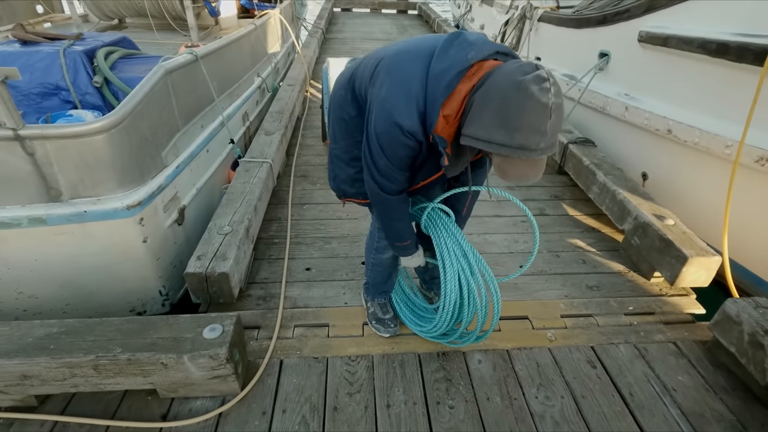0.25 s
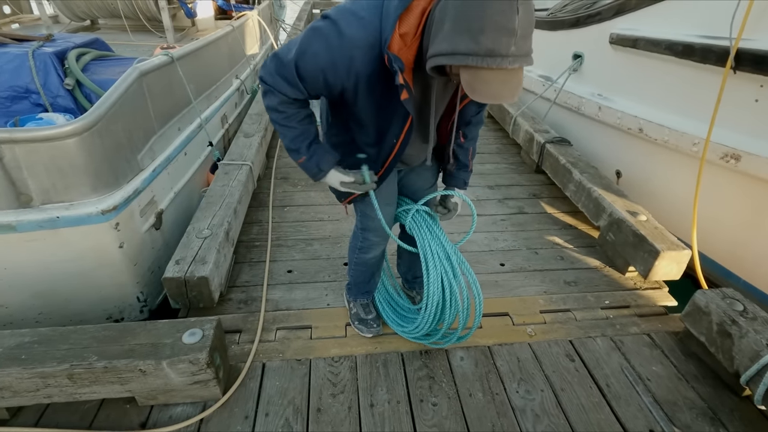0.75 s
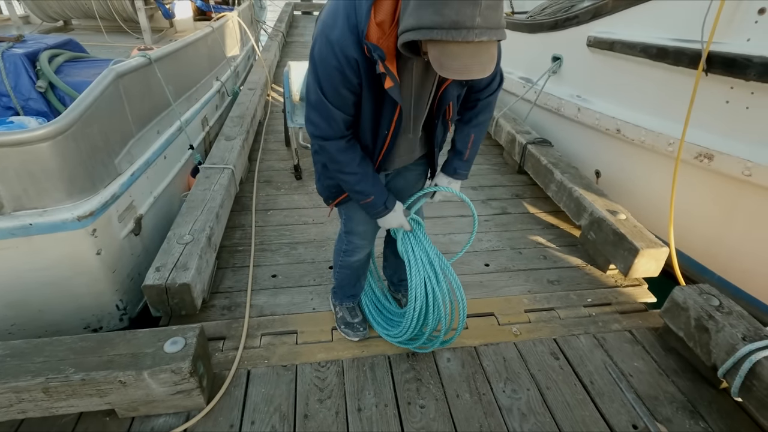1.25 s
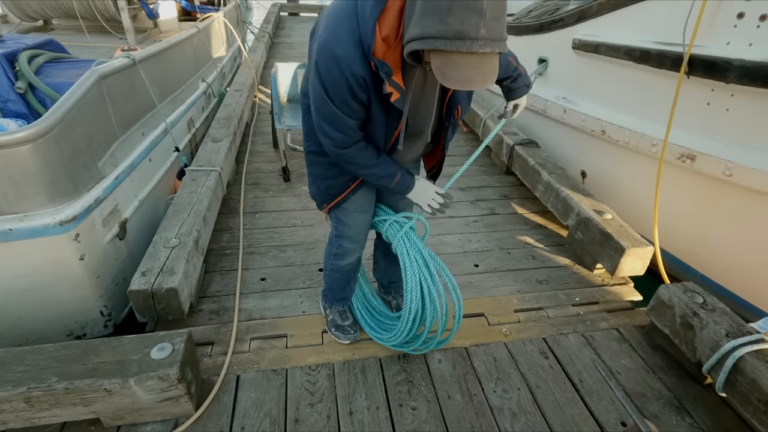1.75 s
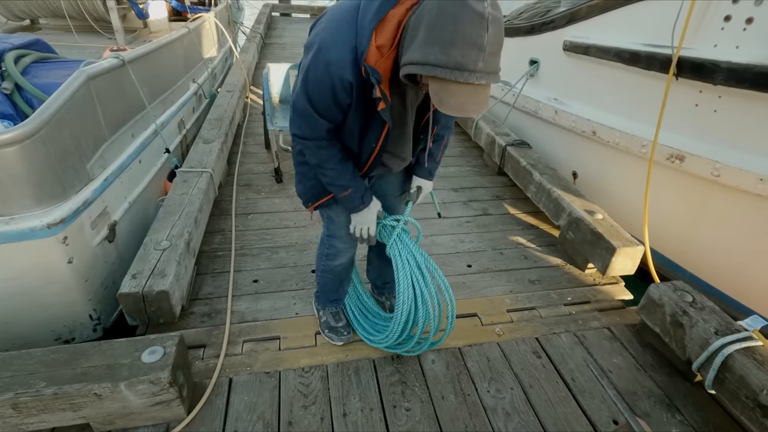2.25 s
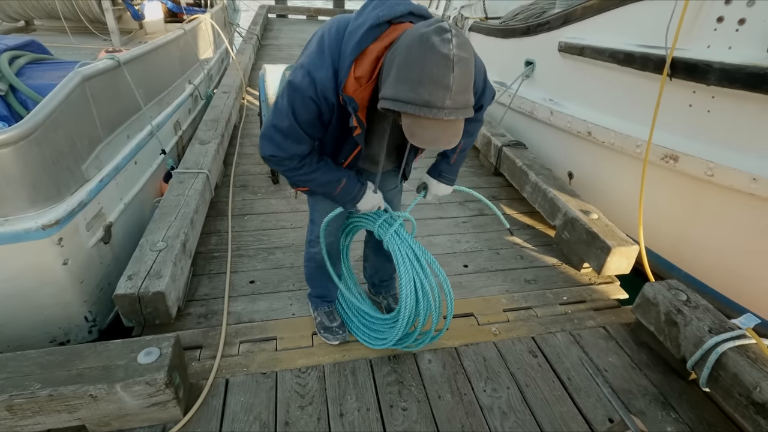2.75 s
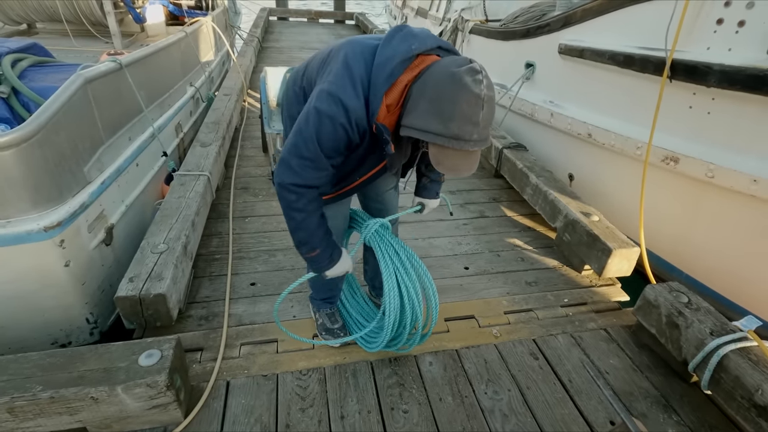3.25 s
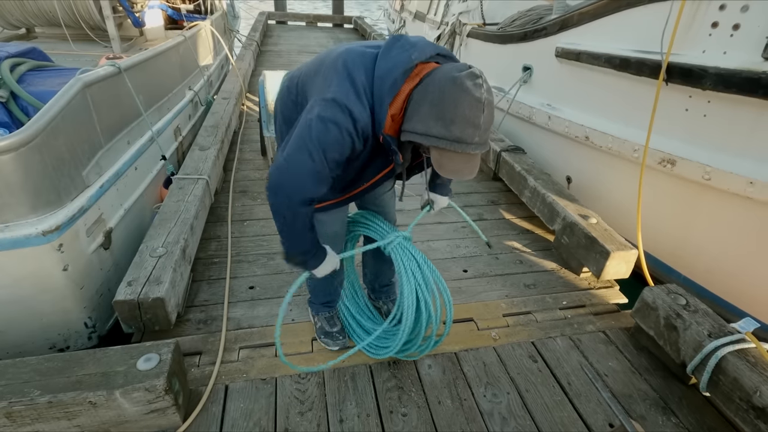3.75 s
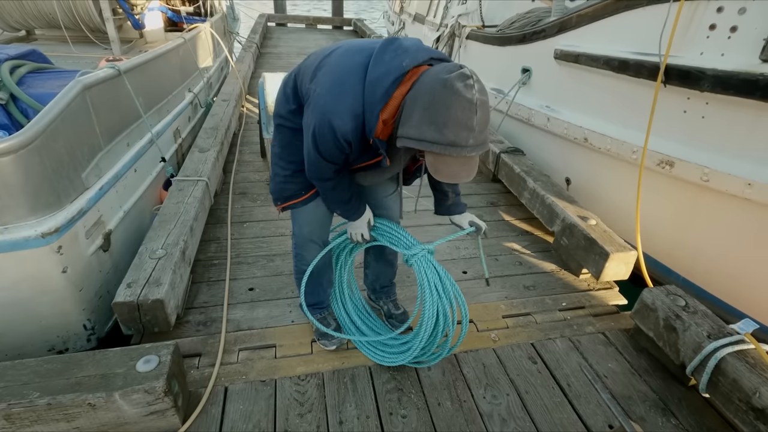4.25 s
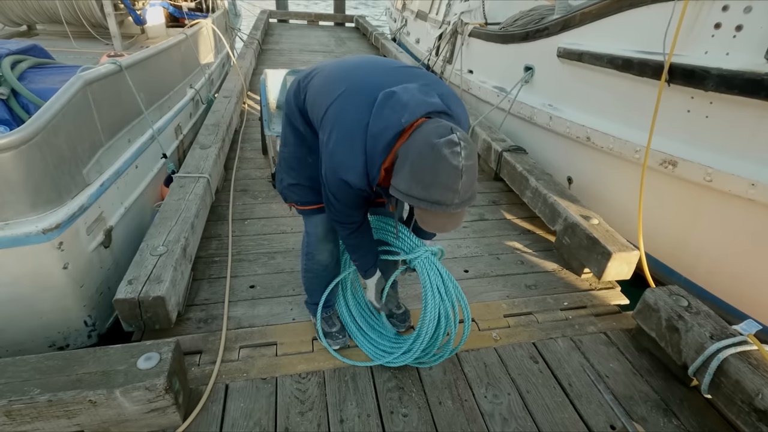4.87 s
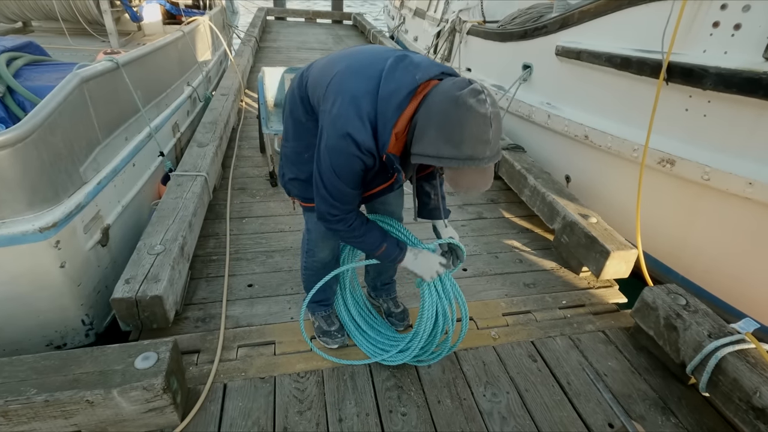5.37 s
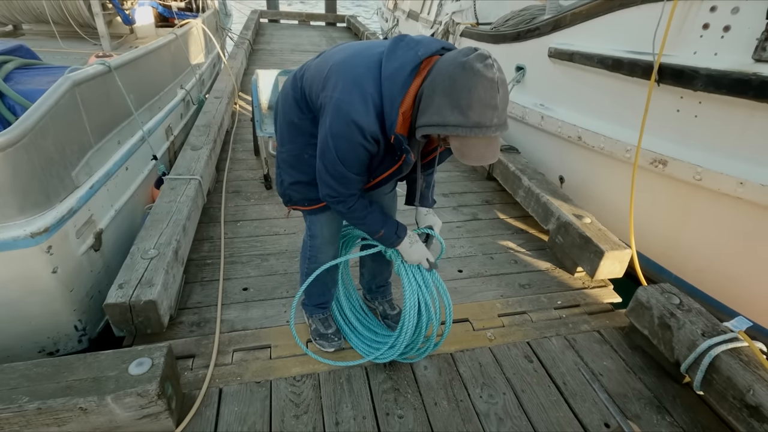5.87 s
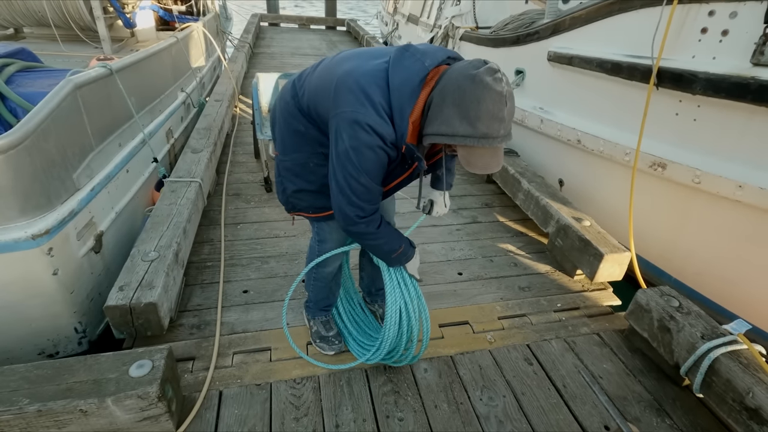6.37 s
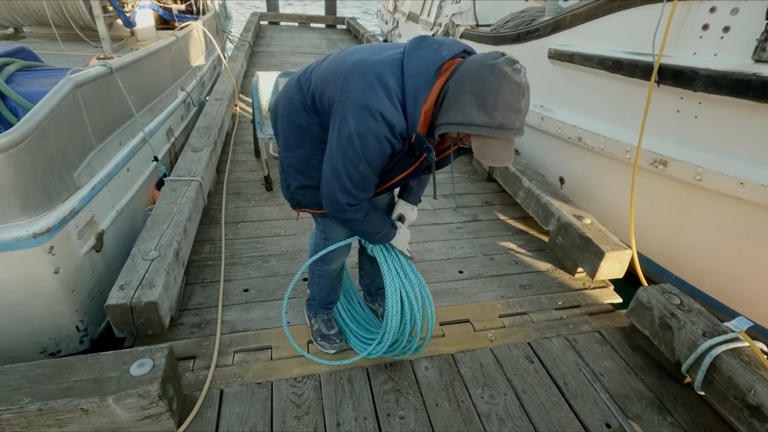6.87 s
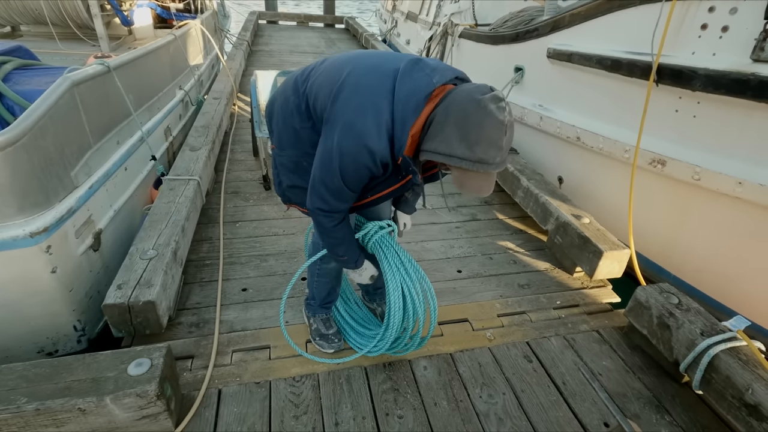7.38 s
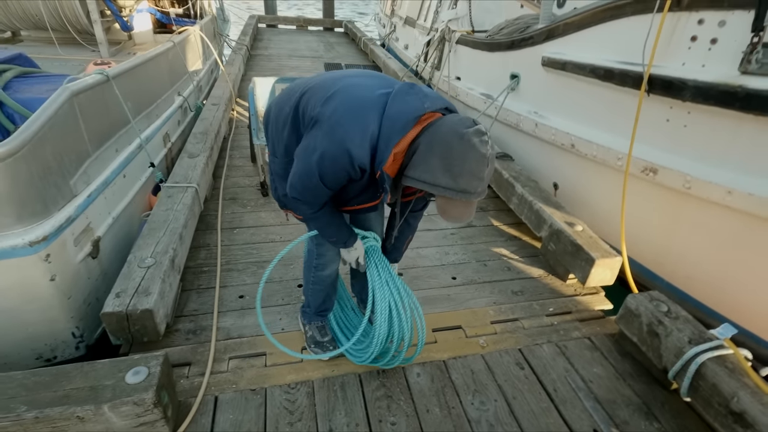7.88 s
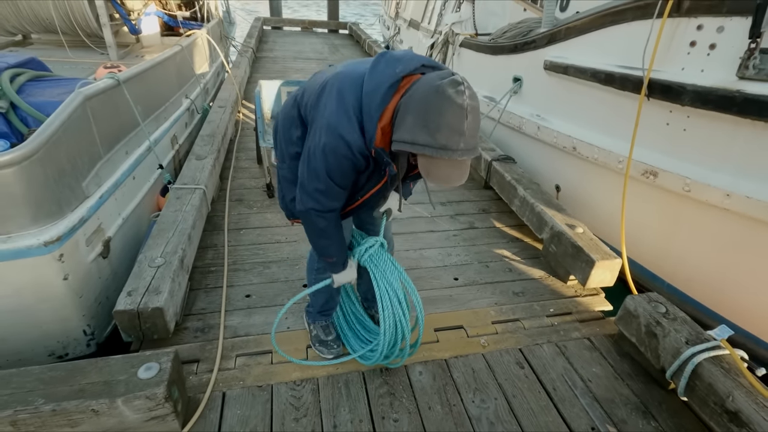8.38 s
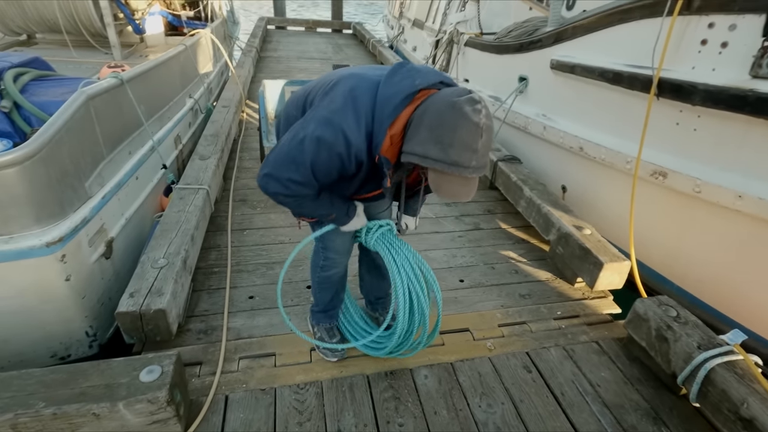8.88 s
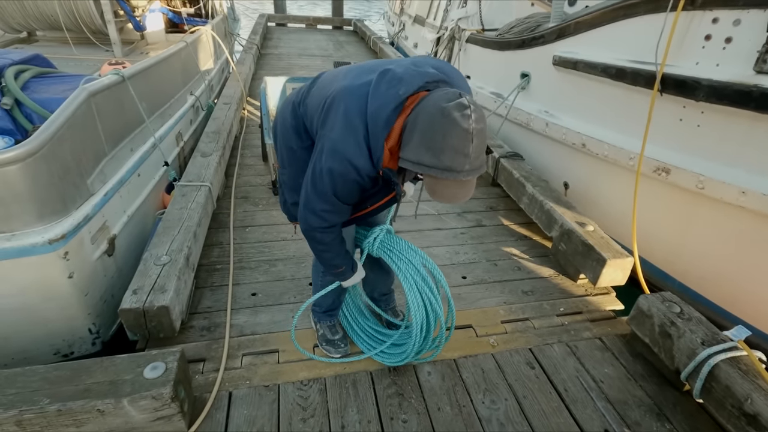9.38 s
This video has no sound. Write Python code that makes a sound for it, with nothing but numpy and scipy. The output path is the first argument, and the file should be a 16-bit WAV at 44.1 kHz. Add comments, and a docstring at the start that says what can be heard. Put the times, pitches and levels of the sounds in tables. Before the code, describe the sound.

Someone ties up a coil of stiff rope on a dock, heard under gusts of deep wind rumble on the microphone. The rope first slides through a glove in a building rasp, then gives a quick tug with a cluster of sharp knocks. Softer pulls, scattered taps, ticks and jacket rustle follow, the knocks growing busier near the end. Faint drips and a far harbour hum lie behind.

```python
"""First you hear wind buffeting the microphone, with a lumpy rumble and slow pressure swings.
On a wooden dock, stiff plastic rope is pulled through gloved hands and tied round its coil:
its strands catch on the glove and rasp, loops knock on the coil among small high ticks,
and jacket and rope rustle and swish. Behind it, drops trap ringing bubbles between the hulls,
over the far hum of the harbour."""
import sys
import numpy as np
from scipy import signal
from scipy.fft import rfft, irfft
from scipy.io import wavfile
from scipy.ndimage import uniform_filter1d

SR = 44100
rng = np.random.default_rng(int(sys.argv[2]) if len(sys.argv) > 2 else 0)


def put_to_file(sound):
    """Save the sound as 16-bit audio at rate SR, in the file named by the first command-line argument."""
    columns = np.atleast_2d(sound).T  # one column per channel
    safe = np.clip(columns, -1, 1)
    whole_steps = np.round(safe * 32767)
    wavfile.write(sys.argv[1], SR, whole_steps.astype(np.int16))


N = 424683


def gain_of(db):
    """Turns decibels into a number to multiply by."""
    return 10 ** (np.asarray(db) / 20)


def evened(x):
    """Scales a signal so that its average strength (rms) is 1."""
    return x / np.sqrt(np.mean(x ** 2) + 1e-20)


def curve(rows):
    """Joins (t/s, level/dB) points with straight lines, giving a level for every sample."""
    s, db = np.transpose(rows)
    return np.interp(np.arange(N) / SR, s, db)


def coloured(x, points):
    """Shapes the tone of x by (f/Hz, level/dB) points and cuts all beyond them; rms 1."""
    hz, db = np.transpose(points)
    f = np.maximum(np.fft.rfftfreq(len(x), 1 / SR), 1e-3)
    shape_db = np.interp(np.log(f), np.log(hz), db, left=-200, right=-200)
    return evened(irfft(rfft(x) * gain_of(shape_db), len(x)))


def wander(seconds):
    """A smooth random drift of rms 1 that changes over the given time."""
    size = max(round(seconds * SR), 2)
    return evened(uniform_filter1d(uniform_filter1d(rng.standard_normal(N), size), size))


def steady(x, seconds):
    """Removes most of a noise's own drift in level, so that a curve can set it."""
    size = round(seconds * SR)
    power = uniform_filter1d(uniform_filter1d(x ** 2, size), size)
    return evened(x / np.sqrt(abs(power) + 0.15))


def resonate(x, hz, width):
    """Lets x ring around one pitch; a smaller width (Hz) rings longer."""
    r = np.exp(-np.pi * width / SR)
    return 2 * signal.lfilter([1 - r], [1, -r * np.exp(2j * np.pi * hz / SR)], x).real


def band(x, hz, width):
    """Keeps one band of x by ringing it twice; rms 1."""
    return evened(resonate(resonate(x, hz, width), hz, width))


def add(mix, s, sound):
    """Mixes a sound in at s seconds."""
    part = mix[round(s * SR):][:len(sound)]
    part += sound[:len(part)]


def swell(s, db, rise_s, fall_s, rise_round=2.52):
    """The gain of one movement: up 60.5 dB over rise_s to its peak at s, down as much over fall_s."""
    t = np.arange(N) / SR - s
    from_peak = np.minimum(abs(t) / np.where(t < 0, rise_s, fall_s), 8)
    return gain_of(db - 60.5 * from_peak ** np.where(t < 0, rise_round, 2.52))


def slips(per_s, spread_db, clump_db, clump_s):
    """Rubbing surfaces stick and slip, making clumps of uneven clicks."""
    size = gain_of(spread_db * np.minimum(rng.exponential(1, N), 4))
    clicks = size * rng.standard_normal(N) * (rng.random(N) < per_s / SR)
    return clicks * gain_of(clump_db * wander(clump_s))


# tone of the far harbour hum and water wash: f/Hz, level/dB
WASH_TONE = [(60, -2.5), (100, -3), (222, -8.5), (363, -12), (1030, -16), (3180, -30.5), (6000, -34),
             (8500, -33), (10000, -36.5), (16000, -38)]
# a far engine's drone comes and goes: t/s, level/dB
ENGINE_LEVELS = [(.3, -68), (1, -58), (2.3, -58), (3.3, -66)]


def harbour(wash_db=-48.5, engine_hz=226.4):
    """A smooth far wash swells a little, and an engine drones on one wavering note."""
    wash = gain_of(wash_db + .7 * wander(.1)) * coloured(rng.standard_normal(N), WASH_TONE)
    pitch = engine_hz + .8 * wander(.3)
    drone = np.sqrt(2) * np.sin(2 * np.pi * np.cumsum(pitch) / SR)
    return wash + gain_of(curve(ENGINE_LEVELS)) * drone


# nearby water drips: t/s, level/dB, bubble f/Hz, time until it bursts/s
NEAR_DRIPS = [(0.645, -39.5, 1055, 0.03), (.878, -40, 810, 0.0053), (2.328, -36.5, 437, 0.016),
              (2.863, -40, 1656, 0.0019), (3.642, -42.5, 2040, 0.0061), (3.672, -37.5, 810, 0.02),
              (5.808, -36.5, 984, 0.021), (6.5, -38.5, 1510, 0.0092), (7.621, -41, 1180, 0.02)]


def drips(far_count=120):
    """Each drop, near or far, traps a bubble that rings, rises slightly in pitch and bursts."""
    out, t = np.zeros(N), np.arange(4000) / SR
    far_drips = rng.random((far_count, 4)) * [N / SR, 9, 1300, .015] + [0, -61.5, 400, .005]
    for s, db, hz, burst_s in [*NEAR_DRIPS, *far_drips]:
        rise = np.minimum(t / 0.00068, 1)
        fade = gain_of(-180 * t - 930 * np.maximum(t - burst_s, 0))
        bubble = np.sin(2 * np.pi * hz * (t + 0.52 * t ** 2))
        add(out, s, gain_of(db) * rise * fade * bubble)
    return out


# strength of the gusts: t/s, rumble level/dB, buffeting level/dB
GUST_LEVELS = [(.05, -20, -31), (.33, -31, -40), (.51, -23, -35), (.87, -31, -48), (1.0, -31, -33),
               (1.15, -33, -46), (1.85, -30, -42), (2.82, -40, -54), (2.94, -17, -29), (3.08, -19, -37),
               (3.62, -43, -50), (3.92, -35, -46), (4.1, -43, -50), (4.3, -25, -45), (5.1, -38, -47),
               (5.4, -18, -41), (5.8, -25, -41), (6.1, -31, -38), (6.42, -23, -35), (6.6, -30, -44),
               (7.1, -28, -37), (7.27, -34, -45), (7.48, -14, -33), (7.65, -23, -38), (8.25, -21, -36),
               (8.76, -18, -25), (8.95, -28, -36), (9.6, -24, -32)]
# strength of the slow pressure swings: t/s, level/dB
SWING_LEVELS = [(0.0, -12), (0.99, -8), (1.29, -14), (8.85, -7), (9.63, -13)]
# tones of the slow swings, the deep rumble and the buffeting: f/Hz, level/dB
SWING_TONE = [(1, -4), (3, 0), (10, -2), (15, -9), (20, -30), (25, -55)]
RUMBLE_TONE = [(12, -30), (19, 0), (30, -8), (40, -13), (50, -40)]
BUFFET_TONE = [(30, -30), (42, 0), (55, -2), (100, -13), (200, -29), (400, -66)]


def wind(travel_limit=.95):
    """Big swirls of air push the microphone's membrane slowly; small ones rumble, buffet and roar."""
    swing = steady(coloured(rng.standard_normal(N), SWING_TONE), seconds=.4)
    swing *= gain_of(curve(SWING_LEVELS))
    swing /= (1 + (swing / travel_limit) ** 4) ** .25  # the membrane can only move so far
    lumps = gain_of(3 * wander(.13))
    rumble = steady(coloured(rng.standard_normal(N), RUMBLE_TONE), seconds=.25) * lumps
    buffet = evened(steady(coloured(rng.standard_normal(N), BUFFET_TONE), seconds=.18) * lumps)
    roar = evened(resonate(resonate(rng.standard_normal(N), 125, 175), 100, 2100) * lumps)
    gusts = np.array(GUST_LEVELS)
    rumble_db, buffet_db = curve(gusts[:, [0, 1]]), curve(gusts[:, [0, 2]])
    roar_db = -48.5 + 0.74 * (buffet_db + 38)  # follows the buffeting, but changes less
    return swing + gain_of(rumble_db) * rumble + gain_of(buffet_db) * buffet + gain_of(roar_db) * roar


# soft swishes of sleeves, and of the rope trailing off after a pull:
# peak t/s, level/dB, build-up/s, die-away/s, centre f/Hz
SOFT_SWISHES = [(.17, -50.5, 0.09, 0.071, 2630), (1.575, -51, .05, 0.063, 1770),
                (6.055, -54, 0.091, 0.065, 4200), (6.31, -54, 0.071, .04, 3000)]


def swishes():
    """A sliding sleeve or trailing rope makes one soft band of smooth noise."""
    noise = rng.standard_normal(N)
    return sum(swell(*move) * band(noise, hz, 0.72 * hz) for *move, hz in SOFT_SWISHES)


# tone of the rustle, with the microphone's treble dip and peak: f/Hz, level/dB
RUSTLE_TONE = [(600, 12), (1400, 6), (2600, 2.5), (4000, -0.5), (6300, -4), (8400, -1.5), (9800, -10.5),
               (13000, -8), (16000, -17)]


def rustling():
    """Thousands of tiny slips each second blur into a fine rustle."""
    return coloured(slips(per_s=12000, spread_db=3, clump_db=1.6, clump_s=.005), RUSTLE_TONE)


# hands and jacket moving: peak t/s, level/dB, build-up/s, die-away/s
JACKET_MOVES = [(.24, -53.5, 0.049, 0.052), (.62, -56, 0.27, 0.28), (1.72, -58, 0.094, 0.28),
                (2.16, -57.5, .1, 0.081), (2.45, -56.5, 0.31, 0.36), (2.75, -59, 0.43, 0.28),
                (3.04, -56, 0.098, 0.2), (3.19, -45.5, 0.036, 0.15), (3.82, -51.5, 0.13, 0.18),
                (4.25, -56, 0.52, 1), (4.79, -51, 0.021, 0.078), (5.0, -53, 0.089, 0.03),
                (5.18, -57.5, 0.17, 0.42), (6.42, -53, 0.22, 0.21), (7.21, -54, 0.059, 0.15),
                (7.8, -50.5, 0.42, 0.51), (8.27, -53, 0.22, 0.48), (8.898, -54.5, 0.18, 0.13),
                (9.24, -55.5, 0.48, 0.29)]


def jacket(rustle, still_db=-60, crinkle_db=-17):
    """Cloth rustles with each move, and faintly in between; its stiff folds tick on top."""
    folds = slips(per_s=60, spread_db=2.5, clump_db=3, clump_s=.03)
    crinkles = gain_of(crinkle_db) * band(folds, hz=13000, width=2500)
    moving = sum(swell(*move) for move in JACKET_MOVES) + gain_of(still_db)
    return moving * (rustle + crinkles)


# loops knocking on the coil, and small high crackling ticks:
# t/s, level/dB, centre f/Hz, rub level compared with the knock or tick/dB
KNOCKS_AND_TICKS = [(.63, -30, 605, -30), (0.799, -43, 6960, 2), (1.383, -33, 1790, -17),
                    (1.657, -39, 3020, 5), (2.24, -36, 960, -25), (2.325, -31, 826, -17),
                    (2.459, -36.5, 2290, 0.5), (3.163, -19, 3180, -21), (3.173, -16, 480, -28),
                    (3.187, -25.5, 700, -9), (3.201, -27, 600, -7), (4.08, -31.5, 850, -34),
                    (4.201, -30, 1200, -4.5), (4.458, -35, 7000, 3.5), (4.674, -33.5, 950, -23),
                    (4.767, -21, 2480, -13.5), (4.781, -24, 1210, -29), (4.789, -28.5, 1370, -14),
                    (4.811, -29, 1110, -34), (4.937, -29, 1540, -27), (5.223, -33, 2010, -20),
                    (6.235, -34.5, 840, -29), (7.017, -34, 790, -12), (7.543, -41, 8000, 2.5),
                    (7.737, -34.5, 9000, -21), (7.794, -35.5, 1360, -1.5), (7.827, -34.5, 1390, -2),
                    (8.015, -34.5, 9000, -5), (8.201, -39, 6940, -15), (8.27, -29, 9250, -13),
                    (8.295, -35, 8000, -12), (8.437, -37.5, 11100, -31), (8.538, -31.5, 1150, -5),
                    (8.743, -37, 9000, -35), (8.869, -20.5, 2300, -31), (8.8727, -17, 890, -22),
                    (8.948, -33.5, 1310, -7), (9.152, -36.5, 1470, -23), (9.177, -28.5, 1200, -12),
                    (9.234, -28, 970, -11), (9.316, -27.5, 1090, -26)]


def knocks_and_ticks(sharp_db=-22, soft_rise_s=.005):
    """Short bursts with a crisp rub on top: low ones are loops landing, the highest are ticks."""
    out, t = np.zeros(N), np.arange(5000) / SR
    burst_fade = gain_of(-60 * t / .016) + gain_of(-17 - 60 * t / .14)  # a faint rattle lingers
    rub_fade = gain_of(-60 * t / .03) + gain_of(-16 - 60 * t / .14)
    for s, db, hz, rub_db in KNOCKS_AND_TICKS:
        burst_noise, rub_noise = rng.standard_normal((2, len(t)))
        sharpness = min(gain_of(db - sharp_db), 1)
        rise_s = soft_rise_s * (1 - sharpness)  # strong ones start at once, weak ones ease in
        rise = np.minimum((t + 1 / SR) / (rise_s + 1 / SR), 1)
        push = burst_noise * burst_fade * rise
        push[0] = 5 * sharpness ** 2  # the opening click
        burst = resonate(resonate(push, hz, 0.8 * hz), hz, 1.6 * hz)
        rub = gain_of(rub_db) * coloured(rub_noise, RUSTLE_TONE) * rub_fade * rise
        add(out, s - rise_s / 2, gain_of(db) * (burst / abs(burst).max() + rub))
    return out


# pitches at which rope, glove and coil ring: f/Hz, width/Hz, level/dB
ROPE_RINGS = [(490, 146, 0.5), (800, 300, -3.5), (1155, 93, 2.5), (1610, 900, 0), (1875, 540, 4.5),
              (2140, 800, -4), (3190, 900, -8)]


def rope_body(x, tightness):
    """Rope, glove and coil ring broadly; a tighter rope favours the higher pitches."""
    out = np.zeros(N)
    for k, (hz, width, db) in enumerate(ROPE_RINGS):
        tilt = tightness ** (0.4 * np.log2(hz / 1000))
        out += (-1) ** k * gain_of(db) * tilt * resonate(x, hz, width)
    return out


def ridges(s, per_s, clear_per_s=36):
    """The rope's twist bumps unevenly over the glove: slow bumps stand apart, fast ones blur."""
    turns = per_s * (np.arange(N) / SR - s) + .03 * wander(.03)
    return evened(np.exp(clear_per_s / per_s * np.cos(2 * np.pi * turns)))


def rasp(catches, tightness, db, hz, width_hz=420, slack_drop=.25, firm_db=-19.5):
    """A narrow band of the scrape climbs in pitch and stands out as the rope tightens."""
    pitch = hz * (1 - slack_drop * (1 - np.sqrt(tightness)))
    turn = np.exp(2j * np.pi * np.cumsum(pitch) / SR)
    r = np.exp(-np.pi * width_hz / SR)
    # shift down, smooth, shift back up: this keeps a band that follows the pitch
    scrape = (turn * signal.lfilter([1], np.convolve([1, -r], [1, -r]), catches / turn)).real
    rasp_db = db + 1 + 0.1 * (db - firm_db)  # gentler pulls rasp less
    return gain_of(rasp_db) * tightness ** 1.8 * evened(scrape)


# pulls through the glove: peak t/s, level/dB, build-up/s, let-go/s, ridge rate/Hz, top rasp f/Hz
ROPE_PULLS = [(1.525, -25.5, 0.48, 0.072, 122, 1680), (3.167, -24, 0.037, 0.045, 196, 2350),
              (3.8, -40, 0.05, 0.067, 91, 1360), (4.938, -47, 0.23, 0.094, 67, 1510),
              (6.377, -36.5, 0.19, 0.12, 65, 1586)]


def rope_pulls(rustle, drag_db=-2.5, rustle_db=-13):
    """Strands catch on the glove, so the rope rings, rasps and rustles, throbbing with its ridges."""
    catches = evened(slips(per_s=9000, spread_db=1, clump_db=.5, clump_s=.003))
    pulling, effort, rasps = np.zeros((3, N))
    for s, db, rise_s, fall_s, ridges_per_s, hz in ROPE_PULLS:
        tightness = swell(s, 0, rise_s, fall_s, rise_round=1.5)  # tightens to a sharper peak
        throb = ridges(s, ridges_per_s)
        pulling += gain_of(db) * tightness * throb
        effort += tightness
        rasps += throb * rasp(catches, tightness, db, hz)
    drag = rope_body(catches, np.maximum(effort, .05)) / np.std(rope_body(catches, 1))
    strands = gain_of(rustle_db) * effort ** 0.41 * rustle
    return pulling * (gain_of(drag_db) * drag + strands) + rasps


def scene():
    """Everything reaches one microphone; jacket and rope share one rustle."""
    background = wind() + harbour() + drips()
    rustle = rustling()
    return (background + swishes() + jacket(rustle) + knocks_and_ticks() + rope_pulls(rustle))[None]


def record(dry, top_hz=15830):
    """Clips any peak beyond full scale, then removes the highest treble."""
    low_pass = signal.firwin(1023, top_hz, window=("kaiser", 9), fs=SR)
    return signal.oaconvolve(np.clip(dry, -1, 1), low_pass[None], "same")


dry = scene()
out = record(dry)
put_to_file(out)
```